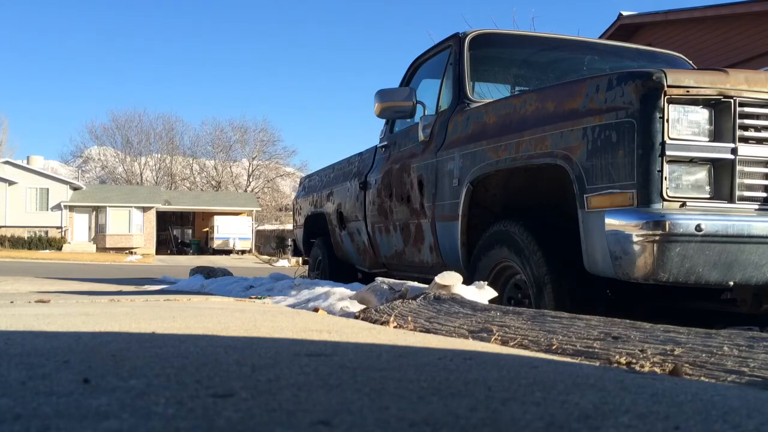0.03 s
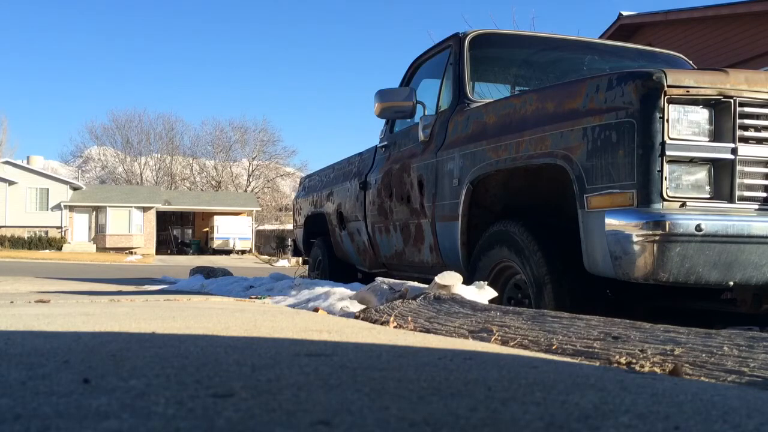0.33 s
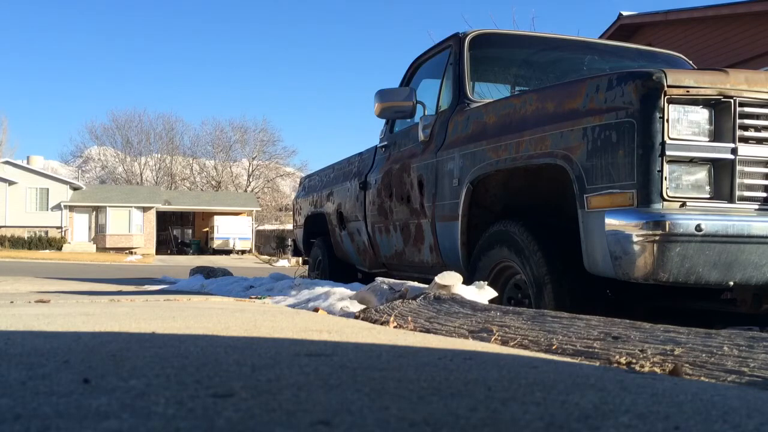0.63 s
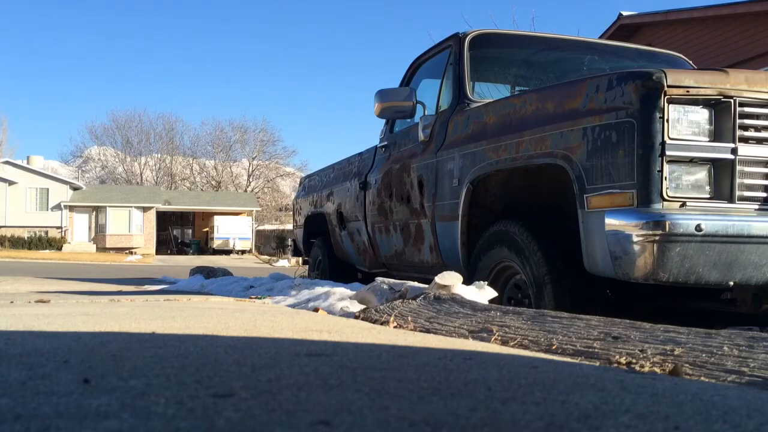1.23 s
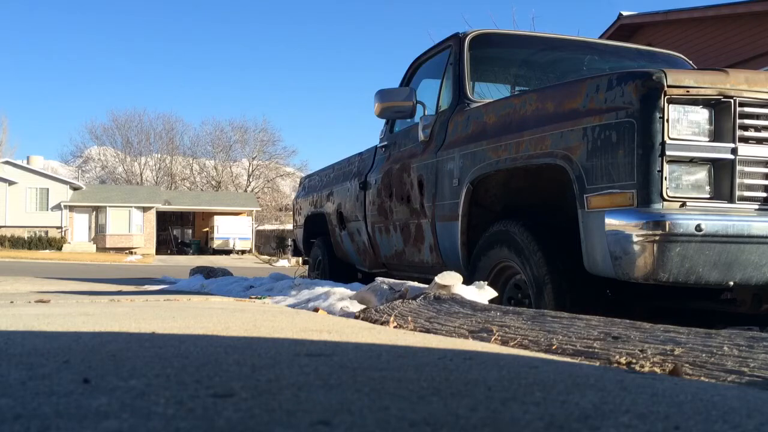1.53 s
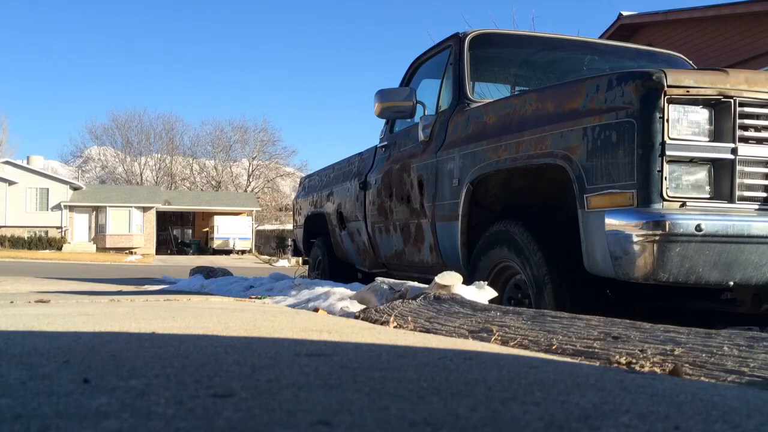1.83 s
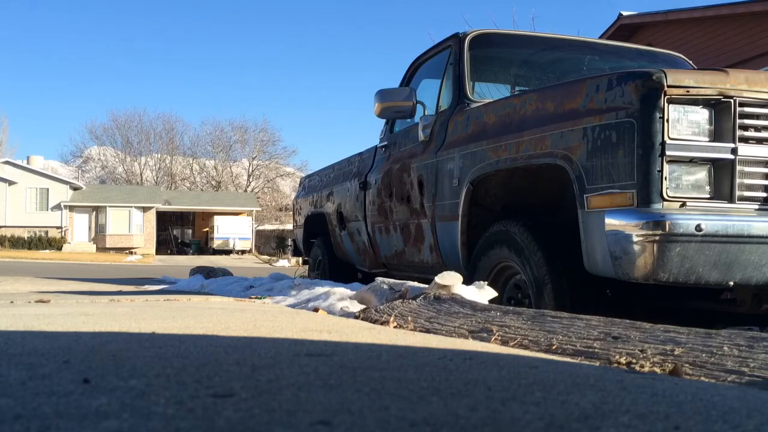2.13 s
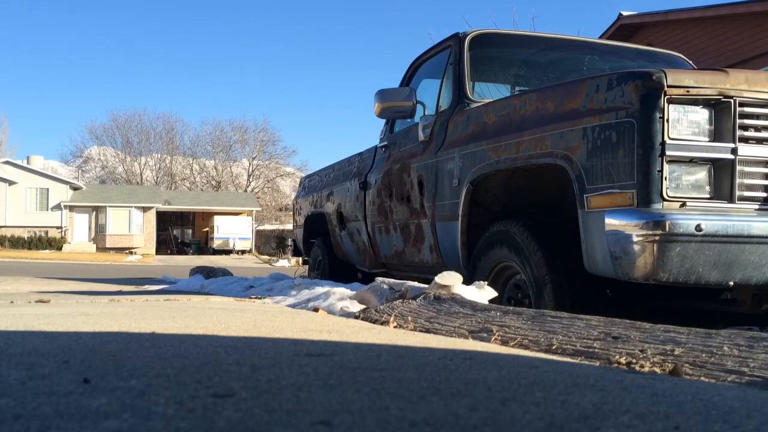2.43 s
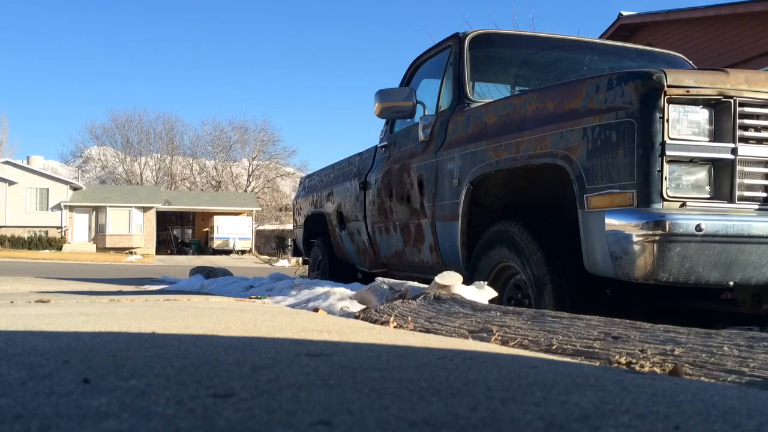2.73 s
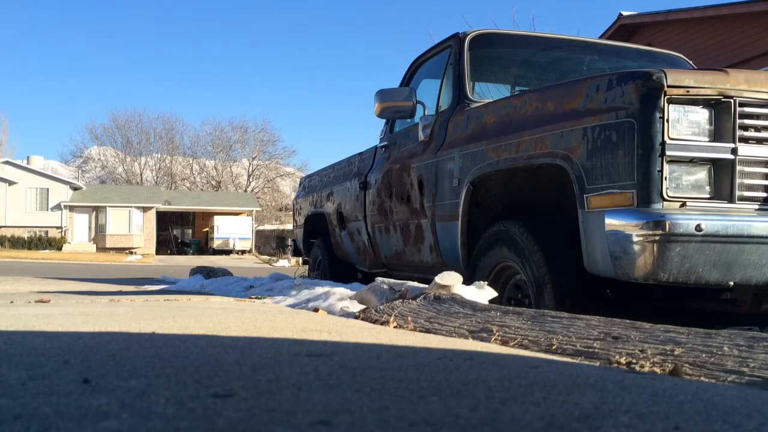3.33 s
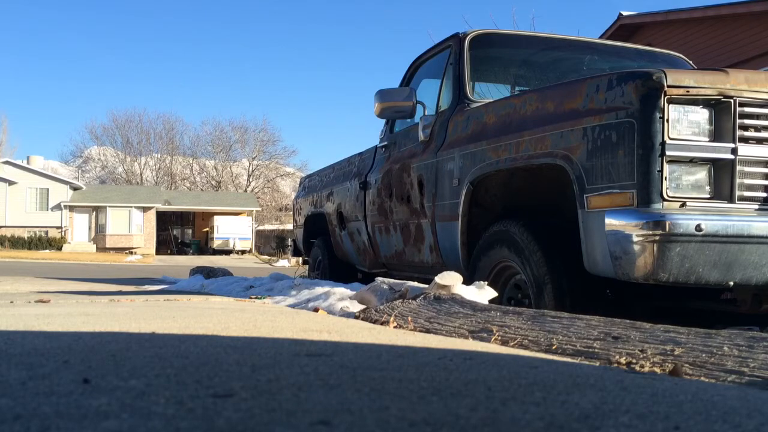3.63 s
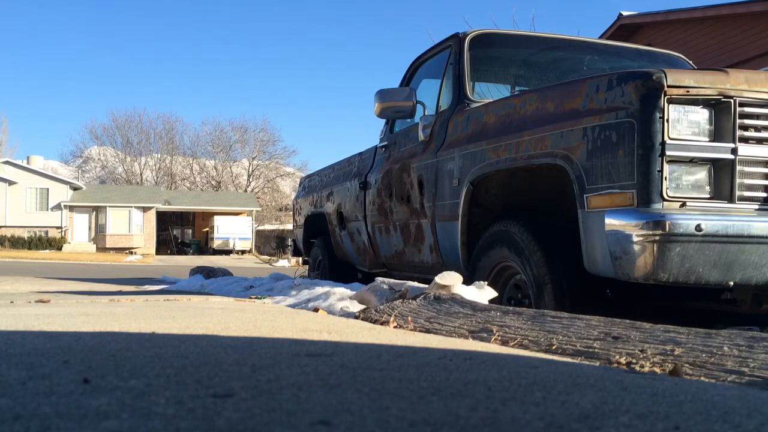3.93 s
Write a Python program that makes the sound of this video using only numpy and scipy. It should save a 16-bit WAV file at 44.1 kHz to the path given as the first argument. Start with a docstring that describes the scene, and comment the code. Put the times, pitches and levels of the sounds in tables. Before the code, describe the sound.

An old truck's starter cranks briefly after a quiet lead-in of low, distant traffic rumble. A relay clicks softly with a short metallic ring at 1 second and again near 2.7, as faraway tyres swell. At about 3.6 seconds the starter engages with a loud metallic clank, then grinds the engine round with a few soft thumps until 4 seconds, without the engine catching.

```python
"""An old diesel truck is cranked on a driveway, over the rumble of distant traffic.
A relay under the hood clicks on at 1 s, ringing its panel. Far tyres swell; the relay clicks off
at 2.75 s. Near 3.6 s the solenoid slams the pinion into the flywheel, and the starter's gear teeth
grind the engine round, sagging against the first compression."""
import sys
import numpy as np
from scipy import signal
from scipy.io import wavfile
from scipy.ndimage import uniform_filter1d

SR = 44100
rng = np.random.default_rng(int(sys.argv[2]) if len(sys.argv) > 2 else 0)


def waveform_to_disk(signal):
    """Save audio, clipped to [-1, 1], as 16-bit WAV at the path in sys.argv[1]."""
    frames = np.transpose(np.atleast_2d(signal))
    scaled = np.clip(frames, -1, 1) * 32767
    samples = np.round(scaled).astype(np.int16)
    wavfile.write(sys.argv[1], SR, samples)


N = 4 * SR

# cranking: t/s, gear grind/dB, block drone/dB, grind treble gain/dB
CRANKING = [(3.62, -38, -48, 8), (3.675, -31.5, -36, -1.5), (3.73, -32, -38, -4.5), (3.77, -34, -34.5, 1),
            (3.805, -32, -35, 1.5), (3.85, -39.5, -34.5, -2), (3.9, -42.5, -37, -6), (3.945, -39, -37, 3),
            (3.985, -30, -43, 3), (4, -30.5, -44, 2.5)]


def starter():
    """Meshing teeth ring the housing (grind) and shake the block (drone)."""
    # spectra: f/Hz, level/dB
    grind_spectrum = [(20, -37), (300, -9), (700, -10.5), (1200, -5), (1900, -1), (2600, -2), (3300, 1.4),
                      (4500, -5), (5700, -6), (6500, -11), (8500, -19), (11000, -23), (15000, -34)]
    drone_spectrum = [(15, -40), (35, -12), (70, 2), (200, 5), (320, -3), (480, -1), (750, -11.5),
                      (1200, -11.5), (3000, -41), (9000, -84)]
    engaged = np.arange(N) / SR > CRANKING[0][0]
    grind = gear_teeth(scrape_share=0.81, decay_teeth=1.0, uneven_db=1.2)
    treble = signal.sosfiltfilt(signal.butter(2, 6000, "high", fs=SR, output="sos"), grind)
    grind += treble * (amp(curve(CRANKING, column=3)) - 1)
    grind *= engaged * amp(curve(CRANKING, column=1))
    drone = gear_teeth(scrape_share=0.38, decay_teeth=0.52, uneven_db=1.7)
    drone *= engaged * amp(curve(CRANKING, column=2))
    return colour(grind, grind_spectrum, mesh=1.15) + colour(drone, drone_spectrum, mesh=0.99)


def gear_teeth(scrape_share, decay_teeth, uneven_db):
    """One knock and a short scrape per tooth, no two equally hard."""
    # tooth rate: t/s, f/Hz
    mesh_rate = [(3.62, 100), (3.68, 180), (3.725, 212), (3.77, 250), (3.81, 220), (3.84, 210), (3.87, 148),
                 (3.92, 122), (4, 158.4)]
    jitter = 0.015 * unit(uniform_filter1d(rng.standard_normal(N), size=200))
    teeth_passed = np.cumsum(curve(mesh_rate) * (1 + jitter)) / SR
    tooth = teeth_passed.astype(int)
    force = amp(uneven_db * rng.standard_normal(N))[tooth]
    knocks = np.diff(tooth, prepend=0) * force
    scrape = np.exp(-(teeth_passed % 1) / decay_teeth) * force * rng.standard_normal(N)
    engaged = slice(round(CRANKING[0][0] * SR), N)
    knocks = (knocks - knocks.mean()) / knocks[engaged].std()
    scrape /= scrape[engaged].std()
    return np.sqrt(1 - scrape_share) * knocks + np.sqrt(scrape_share) * scrape


def compressions():
    """Soft low thumps as the pistons squeeze and release their air."""
    # t/s, f/Hz, level/dB, 1/e half-width/s
    thumps = [(3.718, 50.5, -32, 0.012), (3.862, 62.7, -34, 0.015), (3.876, 139, -31.5, 0.018)]
    t = np.arange(N) / SR
    return -sum(amp(db) * np.exp(-((t - at_s) / width_s) ** 2) * np.cos(2 * np.pi * hz * (t - at_s))
                for at_s, hz, db, width_s in thumps)


def solenoid():
    """The plunger scrapes forward, then pinion and contacts slam home."""
    # plunger scrapes: t/s, level/dB
    scrapes = [(3.569, -52), (3.5727, -40), (3.576, -34.5), (3.585, -35)]
    # impacts: t/s, slam/dB, thud/dB
    impacts = [(3.595, -30.5, -32.5), (3.6025, -22.5, -38), (3.608, -19.5, -30.5), (3.620, -25.5, -32.5)]
    # spectra: f/Hz, level/dB
    slide_spectrum = [(300, -7), (1500, -7.5), (2600, -10), (4200, -3.5), (6500, -8), (8800, -11),
                      (11000, -8), (15000, -17)]
    slam_spectrum = [(200, -15.5), (700, -3.5), (1300, -2), (1950, 0), (2700, -0.5), (3400, 0.5), (4200, 3),
                     (5700, -4.5), (6500, -1.5), (8800, -13.5), (10800, -11), (15000, -18)]
    slide, slams, thuds = np.zeros((3, N))
    for at_s, db in scrapes:
        add(slide, at_s, rattle(db, hold_s=0.0071, t60_s=0.082, tail_db=-24, tail_t60_s=0.2))
    for at_s, slam_db, thud_db in impacts:
        add(slams, at_s, rattle(slam_db, hold_s=0.0053, t60_s=0.074, tail_db=-24.5, tail_t60_s=0.26))
        add(thuds, at_s, rattle(thud_db, hold_s=0.017, t60_s=0.2, tail_db=-30, tail_t60_s=0.3))
    return (colour(slide, slide_spectrum, slam=0.45) + colour(slams, slam_spectrum, slam=1)
            + body_thud(thuds, slam=0.96))


def relay():
    """Each snap rings the relay case, then thuds and rings its panel; plus two faint ticks."""
    # on, off: t/s, snap/dB, thud/dB, panel ring/dB, thud delay/s, treble damping 0-1
    switchings = [(1.001, -46.5, -38.5, -39, .001, 0.01), (2.748, -55.5, -45, -39, 0.0081, 0.65)]
    # f/Hz, level/dB, t60/s
    panel_modes = [(243.2, -1, 0.4), (260, 2.5, 0.48), (375, -10, 0.13), (421, -6.5, 0.081),
                   (496, -5.5, .14)]
    # t/s, level/dB
    faint_ticks = [(.2916, -80), (3.4405, -81)]
    # f/Hz, level/dB
    snap_spectrum = [(300, 4), (1500, -15), (2500, -9), (5000, -9), (6250, 1.5), (7300, -6), (8800, -15.5),
                     (10500, -10.5), (15000, -14)]
    snaps, thuds, panel = np.zeros((3, N))
    t = np.arange(SR // 2) / SR
    ring = sum(amp(db - 60 * t / t60_s) * np.sin(2 * np.pi * hz * (t + rng.random()))
               for hz, db, t60_s in panel_modes)
    ring *= np.minimum(t / 0.0036, 1)
    for at_s, snap_db, thud_db, ring_db, delay_s, damping in switchings:
        snap = rattle(snap_db, hold_s=0.016, t60_s=0.081, tail_db=-18.5, tail_t60_s=0.37)
        thud = rattle(thud_db, hold_s=0.014, t60_s=0.11, tail_db=-13, tail_t60_s=0.6)
        add(snaps, at_s, signal.lfilter([1 - damping], [1, -damping], snap))
        add(thuds, at_s + delay_s, thud)
        add(panel, at_s + delay_s, amp(ring_db) * ring)
    for at_s, db in faint_ticks:
        add(snaps, at_s, rattle(db, hold_s=0.012, t60_s=0.12, tail_db=-28, tail_t60_s=0.2))
    return colour(snaps, snap_spectrum) + body_thud(thuds) + panel


def rattle(db, hold_s, t60_s, tail_db, tail_t60_s):
    """A blow scattered round the engine bay: dense echoes hold, die fast, leave a faint tail."""
    t = np.arange(SR // 2) / SR
    early = amp(-60 * np.maximum(t - hold_s, 0) / t60_s)
    tail = amp(tail_db - 60 * t / tail_t60_s)
    return amp(db) * (early + tail) * rng.standard_normal(len(t))


def body_thud(blows, slam=0):
    """The low, dull part of blows on metal."""
    # f/Hz, level/dB
    thud_spectrum = [(20, -53), (60, -18), (150, -6), (260, -2), (340, -5), (470, -3.5), (700, -15),
                     (1500, -31), (4000, -56)]
    return colour(blows, thud_spectrum, slam=slam)


def dry_tick():
    """One tiny tick with no ring."""
    impulse = np.zeros(N)
    add(impulse, at_s=1.4233, sound=amp([-37]))
    return signal.lfilter([1], [1, -0.45], impulse)


def street():
    """Steady town rumble and the slow swell of distant tyres."""
    # spectra: f/Hz, level/dB
    town_spectrum = [(12, -57), (20, -30), (37, -21), (47, -9.5), (62, -2), (115, -1.5), (165, -5),
                     (213, -10), (306, -17), (400, -17), (500, -16), (700, -14.5), (880, -13.5),
                     (1100, -16), (1500, -20.5), (2200, -33.5), (3300, -45.5), (4800, -54.5), (7000, -55.5),
                     (10000, -57.5), (15000, -59)]
    tyre_spectrum = [(200, -30.5), (480, -12), (720, 2.5), (900, -0.5), (1300, -11.5), (2000, -28.5),
                     (3200, -41.5), (5000, -51), (12000, -73)]
    # t/s, level/dB
    tyre_swell = [(0, -67.5), (1.55, -61), (1.72, -56), (1.88, -52), (2.07, -60.5), (2.3, -50), (2.5, -45),
                  (2.7, -46), (2.9, -51.5), (3.1, -51.5), (3.32, -49.5), (3.55, -52.5), (4, -49.5)]
    rumble = amp(-45) * unit(colour(rng.standard_normal(N + SR), town_spectrum)[SR:])
    tyres = amp(curve(tyre_swell)) * colour(rng.standard_normal(N), tyre_spectrum)
    return rumble + tyres


def colour(x, spectrum, slam=0, mesh=0):
    """Unit-energy filter: a broad spectrum plus metal resonances, weighted by slam and mesh."""
    # housing, flywheel and engine bay: f/Hz, width/Hz, slam lift/dB, mesh lift/dB
    resonances = [(203, 22, 5, 9), (250, 19, 1, 4.5), (292, 27, 9, 0.5), (336, 22, 9, 3), (383, 22, 9, 4.5),
                  (427, 45, 5, 8), (521.6, 19, 11.5, 3), (718, 33, 9.5, 8.5), (865, 110, 9, 0),
                  (1162, 36, 8, 5), (1309, 23, 12, 10), (1380, 42, 4, 4), (1690, 45, 8, 10),
                  (1880, 29, 9.5, 3), (1970, 30, 8.5, 8), (2060, 35, 11.5, 3), (2254, 21, 7, 9),
                  (2450, 34, 6, 8), (3530, 19, 3, 7), (4050, 70, 7, 8), (4450, 25, 5, 1), (6000, 25, 5, -3)]
    hz = np.fft.rfftfreq(8192, 1 / SR)
    point_hz, point_db = np.transpose(spectrum)
    db = np.interp(np.log(hz + 1), np.log(point_hz), point_db)
    for centre_hz, width_hz, slam_db, mesh_db in resonances:
        db += (slam * slam_db + mesh * mesh_db) / (1 + (2 * (hz - centre_hz) / width_hz) ** 2)
    log_gain = np.log(amp(np.r_[db, db[-2:0:-1]]))
    minimum_phase = np.exp(np.conj(signal.hilbert(log_gain)))
    taps = np.fft.ifft(minimum_phase).real[:len(hz)]
    return signal.fftconvolve(x, taps / np.linalg.norm(taps))[:len(x)]


def amp(db):
    """dB to gain."""
    return 10 ** (np.asarray(db) / 20)


def unit(x):
    """Scale to rms 1."""
    return x / np.sqrt(np.mean(x ** 2) + 1e-20)


def curve(table, column=1):
    """One column of a time table, interpolated per sample."""
    rows = np.array(table)
    return np.interp(np.arange(N) / SR, rows[:, 0], rows[:, column])


def add(mix, at_s, sound):
    """Mix a sound in, in place."""
    part = mix[round(at_s * SR):][:len(sound)]
    part += sound[:len(part)]


def scene():
    """Street and truck, mono."""
    return (street() + relay() + dry_tick() + solenoid() + starter() + compressions())[None]


def record(dry):
    """Low-pass at 15.5 kHz."""
    taps = signal.firwin(511, 15500, window=("kaiser", 9), fs=SR)
    return signal.oaconvolve(dry, taps[None], "same")


dry = scene()
out = record(dry)
waveform_to_disk(out)
```